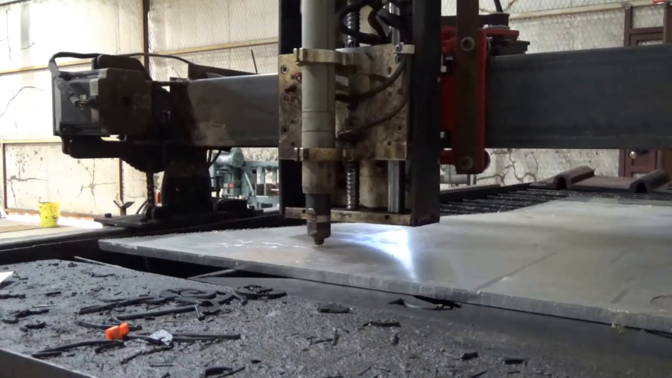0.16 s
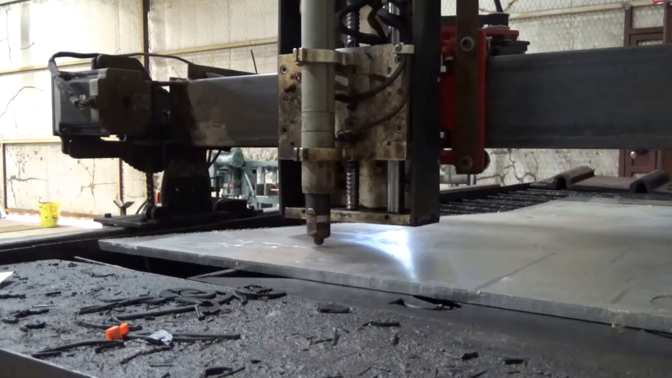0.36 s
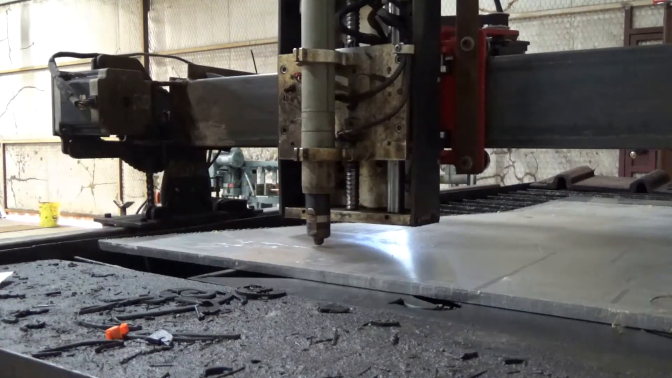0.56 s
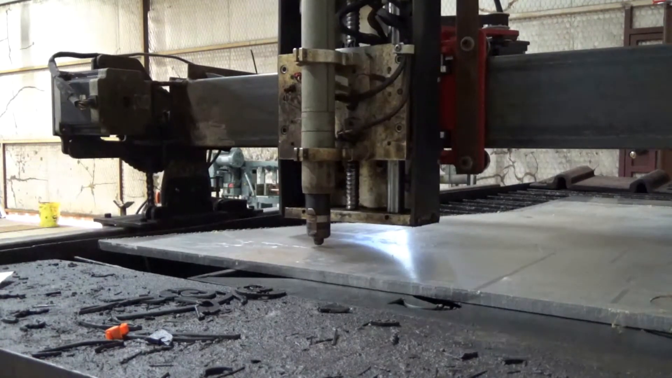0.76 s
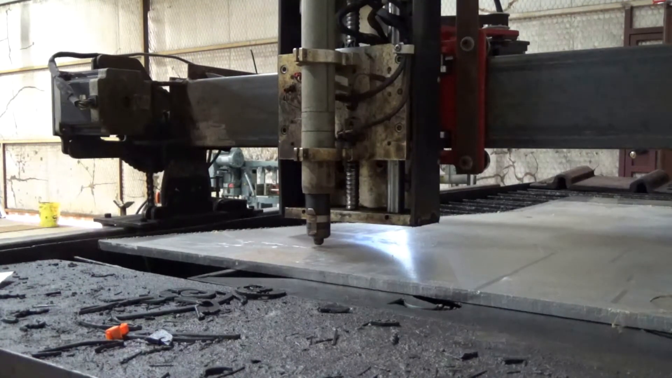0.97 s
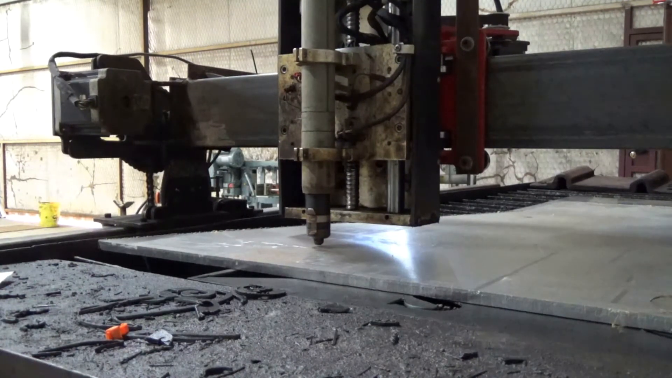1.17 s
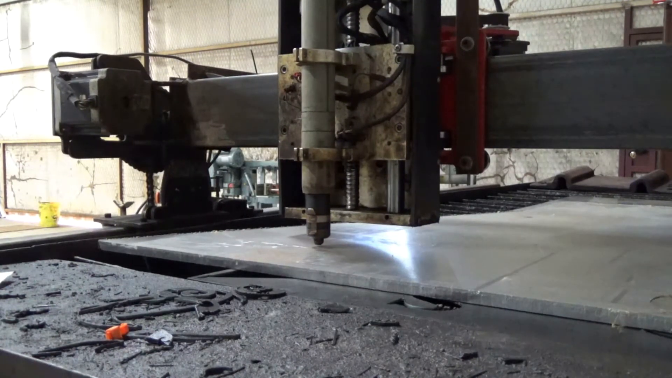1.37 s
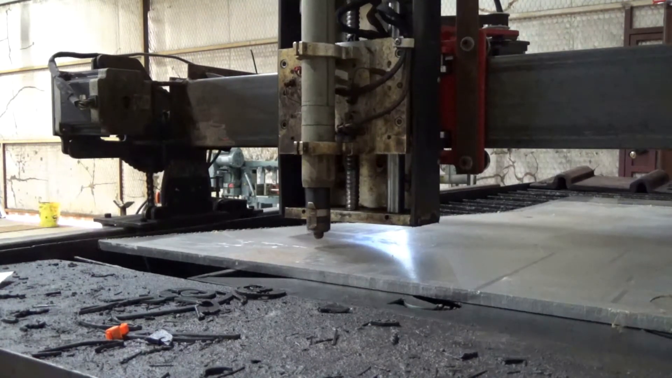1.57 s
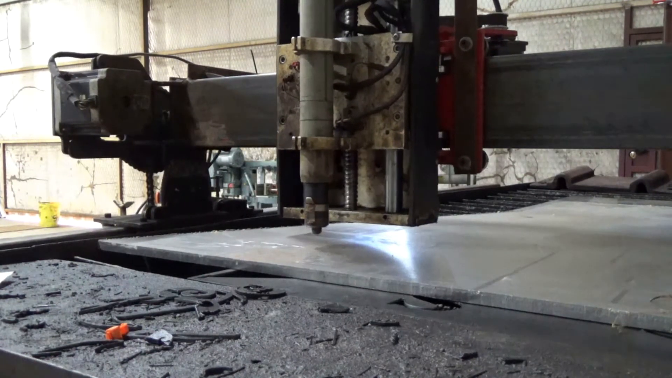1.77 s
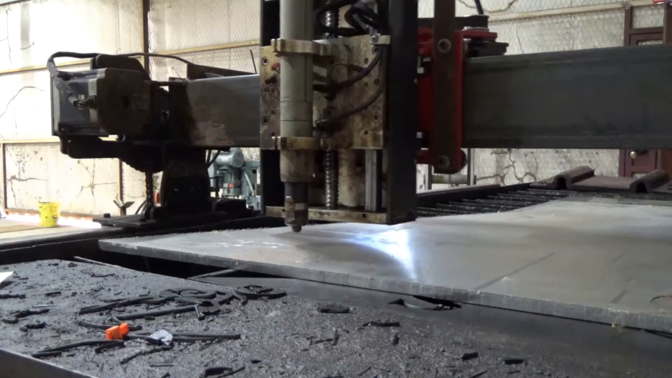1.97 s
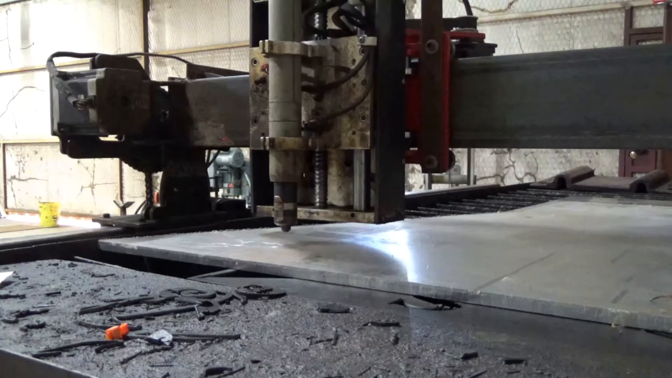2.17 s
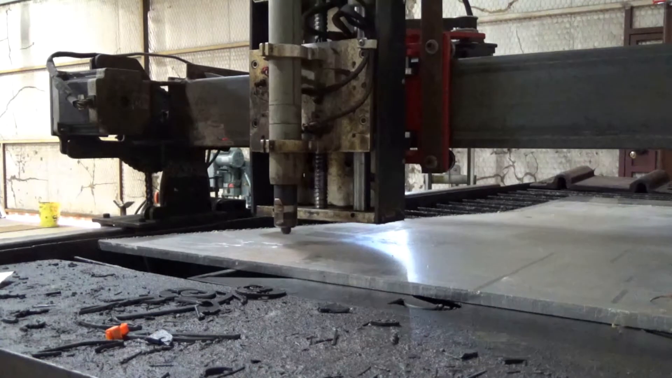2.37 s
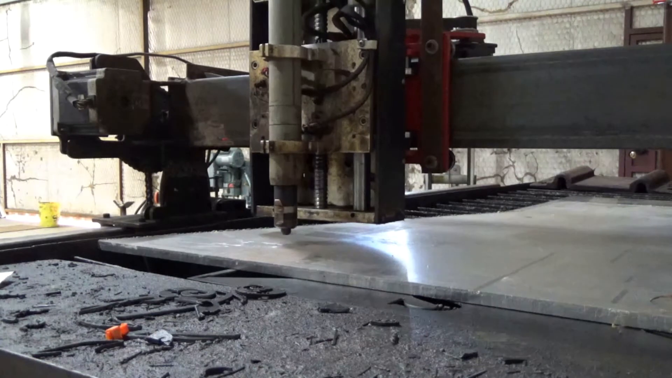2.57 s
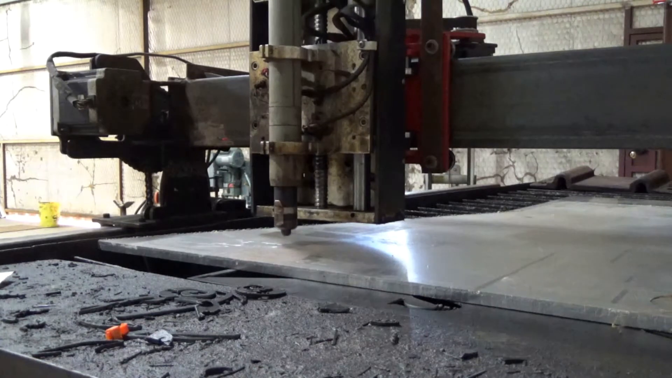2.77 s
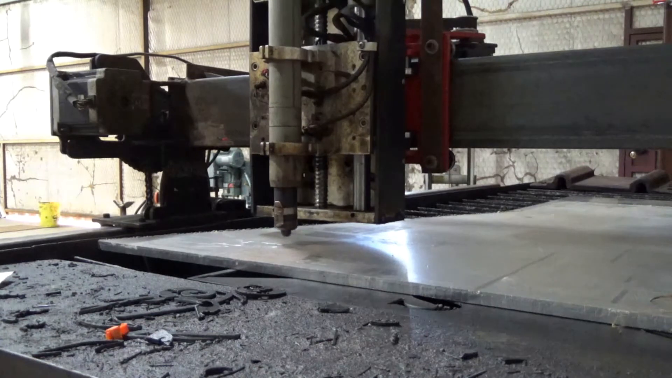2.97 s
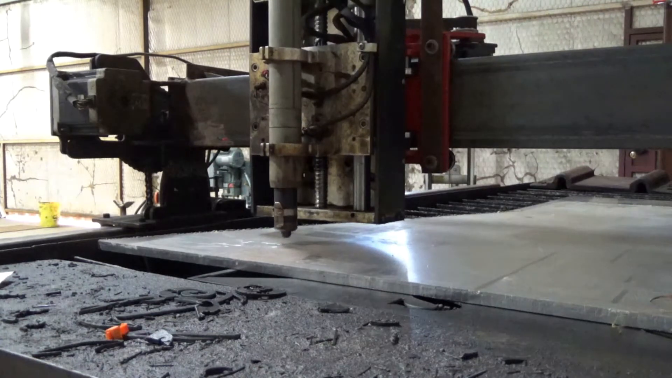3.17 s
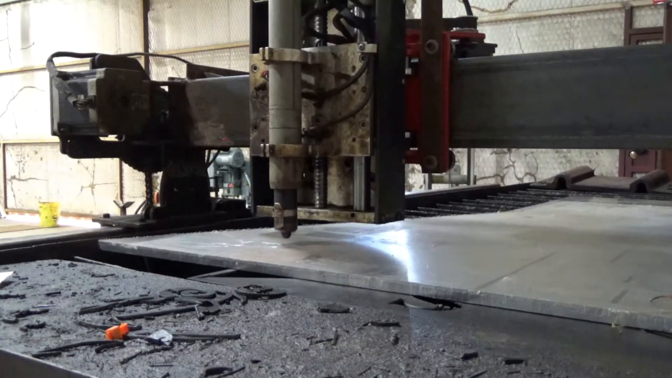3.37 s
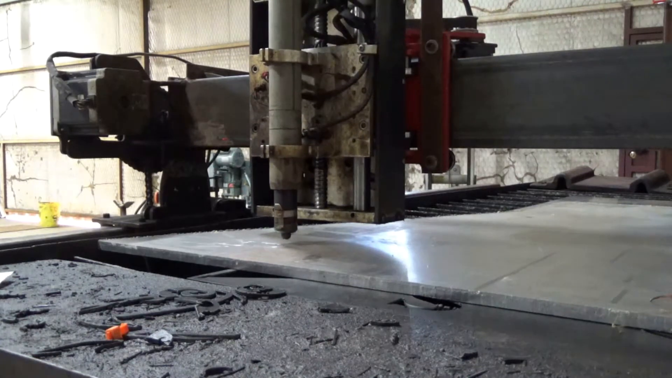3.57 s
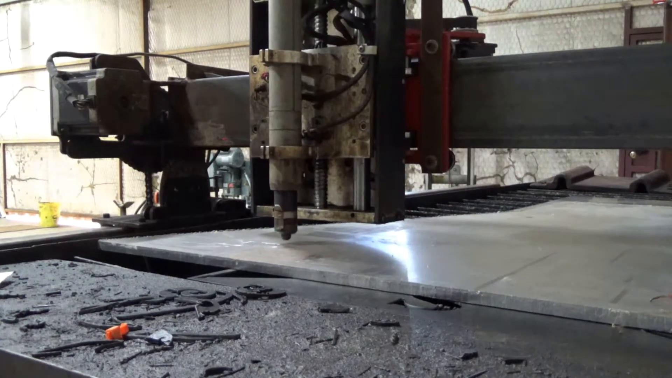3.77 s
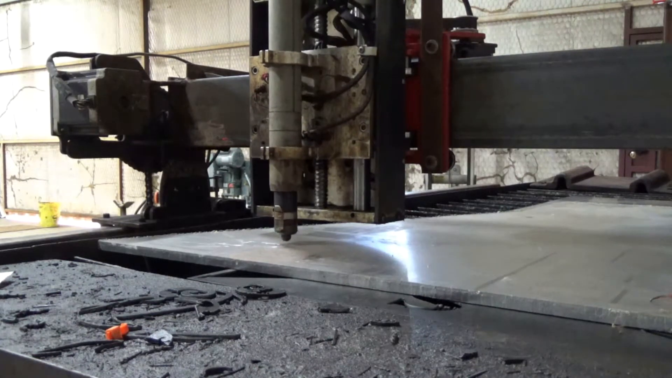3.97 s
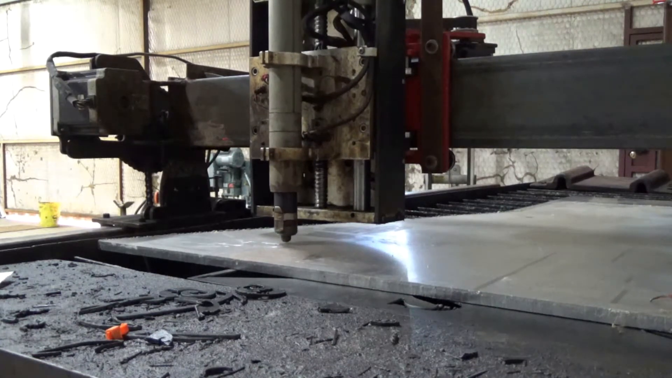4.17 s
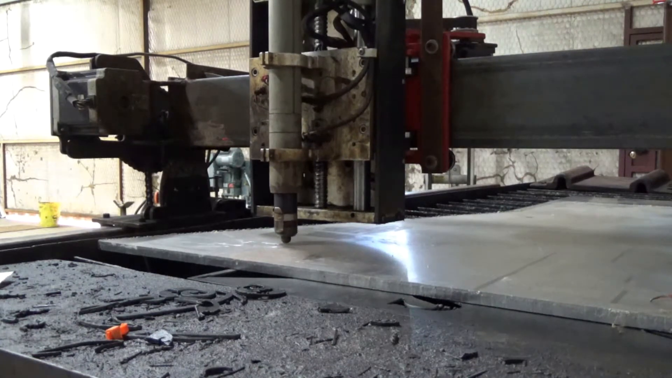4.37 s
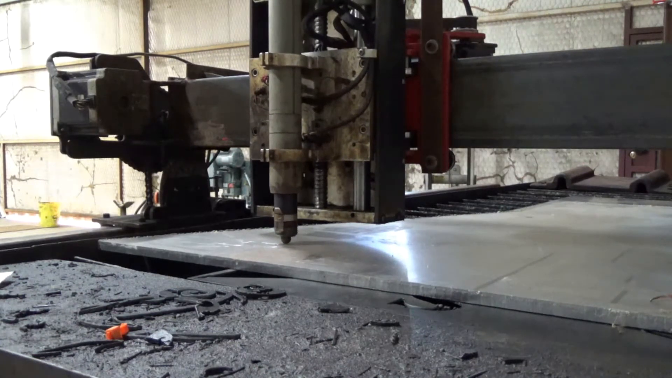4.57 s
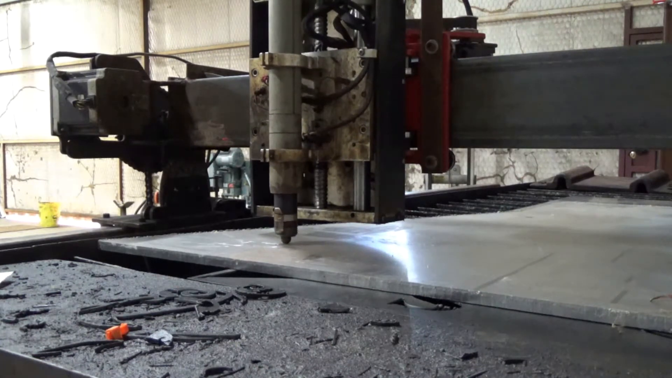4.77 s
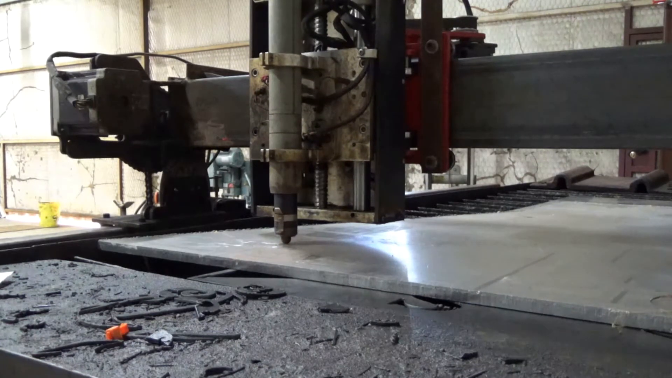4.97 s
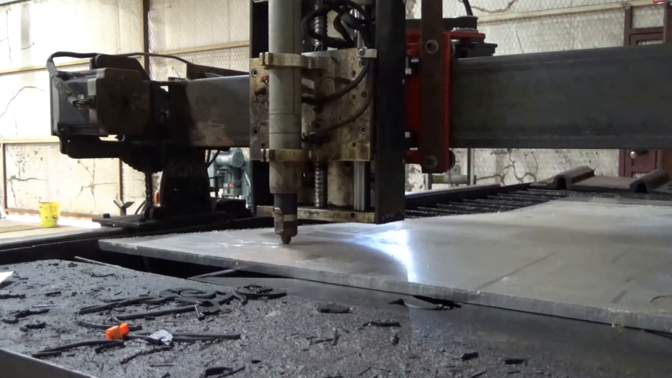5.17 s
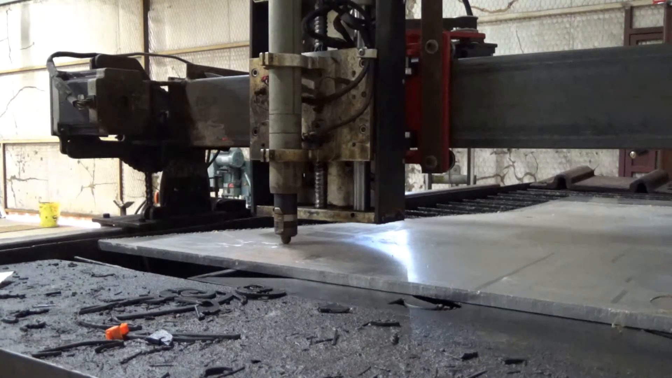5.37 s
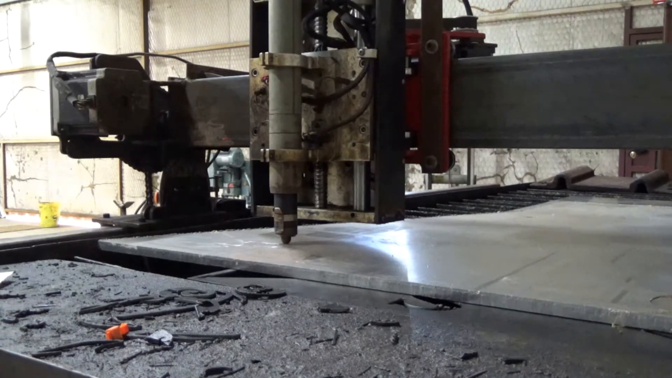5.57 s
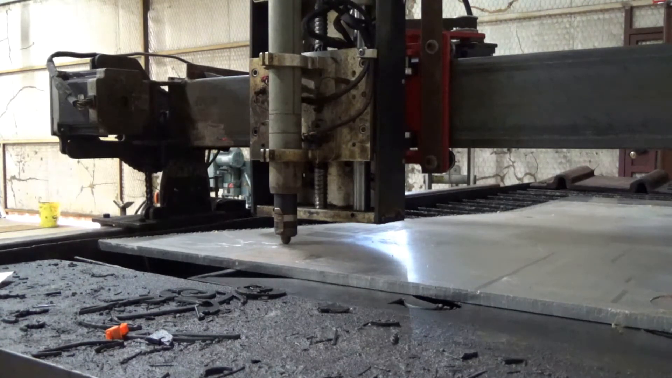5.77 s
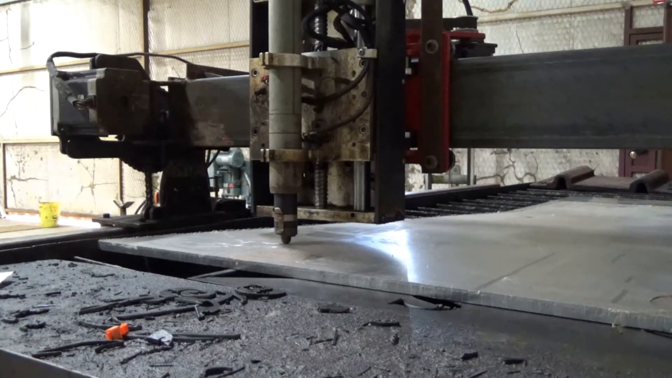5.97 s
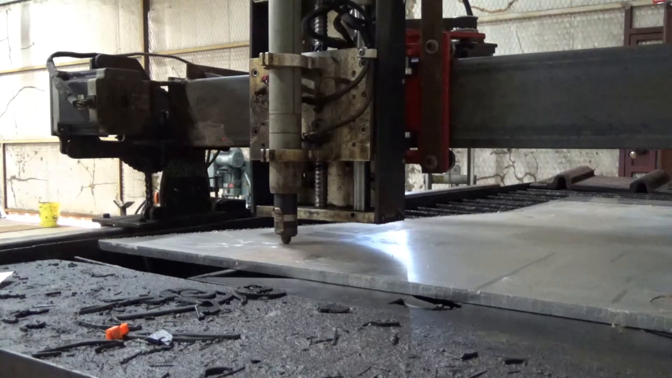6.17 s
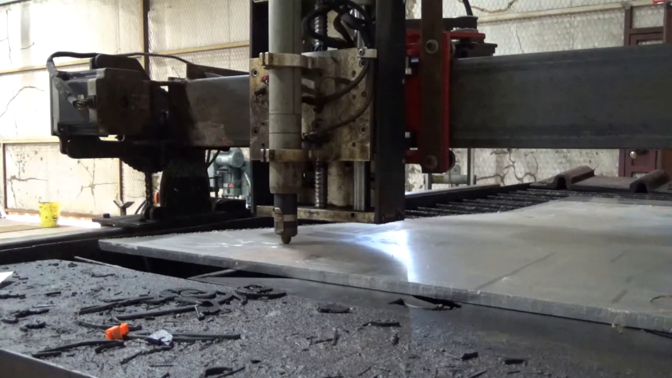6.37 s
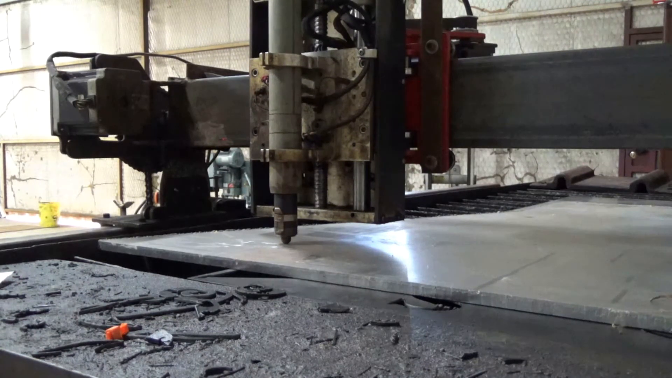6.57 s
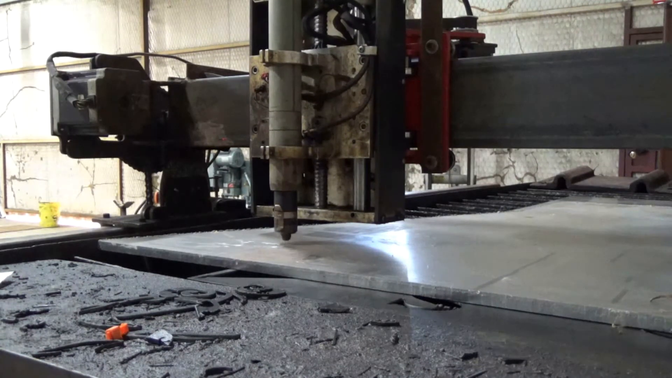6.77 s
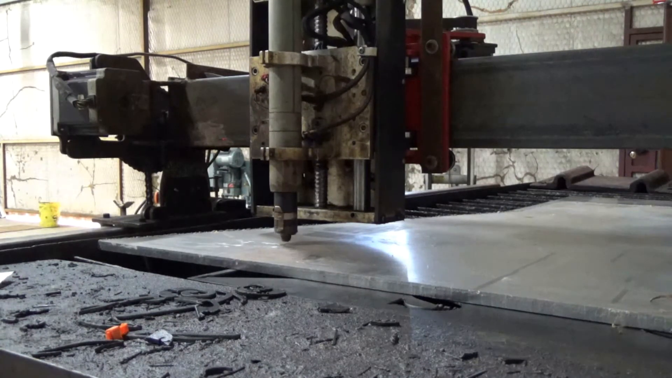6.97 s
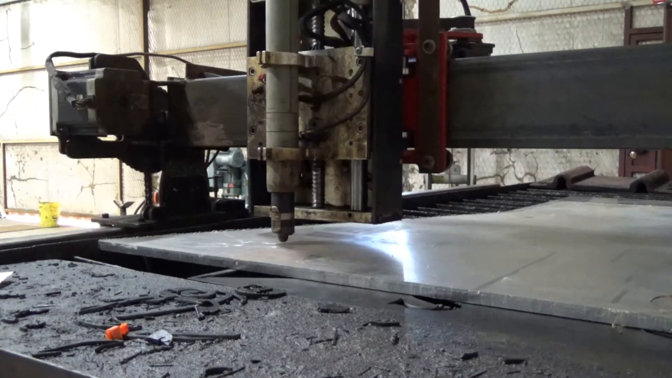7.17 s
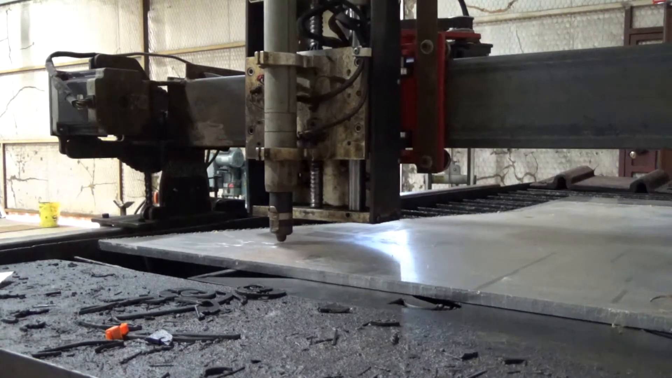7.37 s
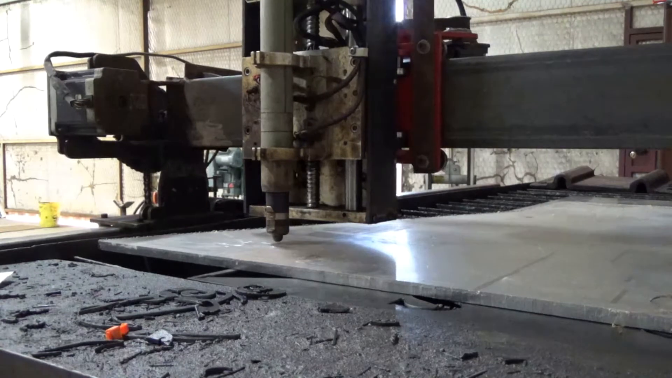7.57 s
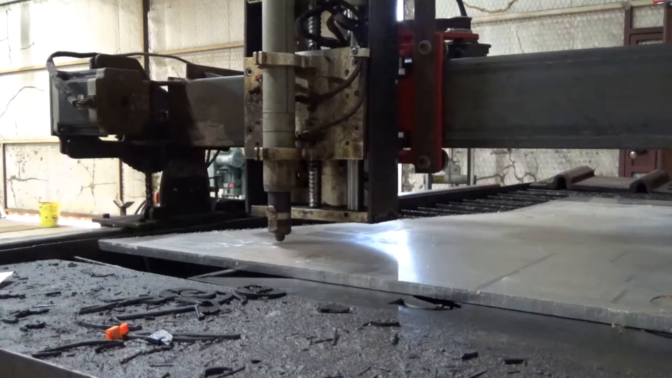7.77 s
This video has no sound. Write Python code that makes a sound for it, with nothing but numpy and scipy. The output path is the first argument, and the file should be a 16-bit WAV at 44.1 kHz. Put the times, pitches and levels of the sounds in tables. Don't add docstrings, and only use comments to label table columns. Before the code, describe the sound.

In a steel-walled shed, fans hum low, air murmurs and motor drives give a thin fuzzy whistle near 9 kHz. A high lift-motor whine already running stops at 0.13 s as the gantry jerks, rumbling, singing briefly and slapping its cable chain until about 0.6. Small dull knocks dot the quiet, strongest at 1.07. A bright whine near 1.7 kHz sweeps up and down at 1.42-1.74; the gantry then glides with rising and falling motor tones until 2.2, overlapped by a short whine at 2.17-2.32. From 2.35 to 6.38 a steady raspy buzz at about 184 steps per second rings the metal carriage, overtones wavering, with soft air puffs around 3-3.6. A twitch at 6.41, a long whine at 6.46-6.87 and another until 7.04 follow. Rough rumbling, grinding and loud chain clatter, ringing off the walls, continue to the end near 8.

```python
import sys
import numpy as np
from scipy import signal
from scipy.fft import rfft, irfft, next_fast_len
from scipy.io import wavfile
from scipy.ndimage import uniform_filter1d, map_coordinates

SR = 44100
rng = np.random.default_rng(int(sys.argv[2]) if len(sys.argv) > 2 else 0)


def nominal_scale(level):
    x = np.asarray(level, float) / 20
    return 10 ** x


def persist_wave(psi):
    counts = np.round(np.clip(psi, -1, 1) * 32767).astype(np.int16)
    wavfile.write(sys.argv[1], SR, np.atleast_2d(counts).T)


N = 344862
TIME = np.arange(N) / SR
COARSE = TIME[::32]
FAST, SLOW = 1719.8, 184.38

# (start [s], stop [s], acceleration [steps/s2])
STROKES = [
    (-.2, .13, 24000),
    (1.42, 1.744, 28000),
    (2.172, 2.322, 17000),
    (6.41, 6.452, 16000),
    (6.464, 6.868, 15200),
    (6.888, 7.044, 15600),
]
# (start [s], stop [s], acceleration [steps/s2])
DESCENT = (2.352, 6.378, 16000)
# (frequency [Hz], width [Hz])
PANELS = [(1659.5, 130), (1843.8, 130)]
# (time [s], level [dB])
SHAKE = [
    [(0.06, -38), (0.1, -57), (0.124, -25.5), (0.164, -21), (0.24, -19.5), (0.302, -27.5), (0.406, -36.5),
     (0.436, -38.5), (0.62, -49)],
    [(1.7, -27), (1.712, -41), (1.754, -25), (1.914, -25), (1.986, -22.5), (2.04, -26), (2.162, -25.5),
     (2.198, -27.5), (2.34, -30.5)],
    [(6.98, -42), (7.032, -25.5), (7.2, -26.5), (7.242, -24.5), (7.394, -26.5), (7.59, -22), (7.656, -30.5),
     (7.672, -20.5), (7.82, -24)],
]
# (time [s], peak [dB], knock [dB], chain t60 [s])
RATTLE = [(0.034, -37, 11, 0.05), (0.07, -29, 5.5, 0.089), (0.2134, -10.5, -23, 0.094),
          (0.2234, -22.5, -3, 0.053), (1.439, -32, 1, 0.061), (1.6174, -24, 2.5, 0.087),
          (1.7263, -24.5, 6.5, 0.09), (1.9586, -39, 5, 0.051), (1.987, -19, -12, 0.075),
          (2.164, -25.5, 2, 0.079), (2.236, -26, -1, 0.055), (2.2867, -38, 5, 0.048),
          (7.007, -36, 3, 0.065), (7.027, -25, -3, 0.067), (7.0346, -14, -3, 0.089),
          (7.1046, -26, 5, 0.063), (7.1706, -24, -5, 0.091), (7.192, -23.5, -19, 0.061),
          (7.2335, -20, -17, 0.075), (7.247, -10.5, -6, 0.09), (7.2728, -11, -6, 0.044),
          (7.283, -15, -21, 0.051), (7.427, -22, -2, 0.038), (7.477, -23.5, 3, 0.052),
          (7.5864, -19.5, -5, 0.055), (7.614, -33, -3, 0.055), (7.669, -13.5, -4.5, 0.062),
          (7.715, -21, -14, 0.082), (7.734, -21, -1, 0.1), (7.8114, -20.5, 1, 0.049)]


def unit(x):
    return x / np.sqrt(np.mean(x ** 2) + 1e-20)


def along(points, hz):
    f, v = np.transpose(points)
    return np.interp(np.log(hz + 1), np.log(f + 1), v)


def curves(rows):
    s, *cols = np.transpose(rows)
    return [np.interp(TIME, s, c, left=-120, right=-120) for c in cols]


def wobble(rate):
    knots = rng.standard_normal(int(N * rate / SR) + 4)
    return np.interp(TIME, COARSE, map_coordinates(knots, [COARSE * rate]))


def bump(s, length):
    return np.interp(TIME, COARSE, np.exp(-((COARSE - s) / length) ** 2))


def filtered(x, response):
    m = next_fast_len(N + SR // 2, True)
    return irfft(rfft(x, m) * response(np.fft.rfftfreq(m, 1 / SR)), m)[..., :N]


def body(modes):
    def ring(f):
        total = 0
        for k, (c, w, db) in enumerate(modes):
            total = total + (-1) ** k * nominal_scale(db) * 1j * f * w / (c * c - f * f + 1j * f * w)
        return total
    return lambda f: np.interp(f, f[::16], ring(f[::16]))


def noise(response, lumps=1):
    return unit(filtered(lumps * rng.standard_normal(N), response))


def steps(start, stop, accel, top, phases, jitter):
    rate = np.clip(accel * np.minimum(TIME - start, stop - TIME), 0, top)
    count = np.cumsum(rate) / SR
    k = np.arange(1, int(count[-1]))
    db, late = np.array(phases)[k % 4].T
    at = np.interp(k + jitter * rng.standard_normal(len(k)), count, np.arange(N)) + late * SR / 1580000.0
    taps = np.floor(at)[:, None] + np.arange(-7, 9)
    away = taps - at[:, None]
    shape = np.sinc(away) * np.cos(away * np.pi / 16) ** 2
    size = nominal_scale(db) * SR / top
    places = np.clip(taps, 0, N - 1).astype(int).ravel()
    return rate / top, count, np.bincount(places, (shape * size[:, None]).ravel(), N)


def stroke_whine(k, speed, count):
    # (multiple of the four-step cycle, level [dB])
    loaded_cycle = [(1, -8.5), (2, -13.5), (3, -11), (4, 4), (5, -7), (6, -12.5), (7, -13), (8, -24),
                    (9, -31), (10, -17), (11, -38), (12, -34), (13, -24), (14, -29)]
    # (multiple of the four-step cycle, level [dB])
    free_cycle = [(1, -29), (2, -18), (3, -17), (4, 0), (5, -21), (6, -63), (7, -37), (8, -16.5), (9, -26),
                  (10, -31.5), (11, -30.5), (12, -24.5), (13, -19.5), (14, -25.5), (15, -30), (16, -26),
                  (17, -33), (18, -31), (19, -50), (20, -40), (21, -38), (22, -31)]
    whine_db = [-31.5, -20.5, -16, -40, -20.5, -13]
    whine, on = np.zeros(N), speed > 0
    for order, db in free_cycle if k else loaded_cycle:
        if order == 4 and k:
            continue
        if order == 8:
            fade = 2.2
        else:
            fade = 3.1 if k else 9
        cycles = order * count[on] / 4 + rng.random()
        whine[on] += nominal_scale(whine_db[k] + db) * speed[on] ** fade * np.sin(2 * np.pi * cycles)
    return whine


def lift_drive():
    # (strength [dB], lateness [0.63 microseconds])
    slow_phases = [(1.5, -5), (3, 19), (1, 32), (2, 50)]
    # (strength [dB], lateness [0.63 microseconds])
    fast_phases = [(21, 7), (-10, 33), (28.5, -2), (28, 64)]
    # (step blow [dB], torque ripple [dB], its extra while speeding up [dB],
    # its extra while braking [dB], grind [dB])
    effort = [(-30, -60, 0, 0, -38), (-30, -18, -6, -0.5, -30), (-28, -23, 2, 3, -34.5),
              (-40, -28, 0, 0, -27), (-29.5, -22, 3.5, 5, -30.5), (-27, -18, 3.5, 1, -35),
              (-38.5, -62, 0, 0, -54.5)]
    force, torque, grind, whine = np.zeros((4, N))
    moves = [(row, FAST, fast_phases, .004) for row in STROKES] + [(DESCENT, SLOW, slow_phases, .0005)]
    for k, (move, (blow_db, ripple_db, start_db, brake_db, grind_db)) in enumerate(zip(moves, effort)):
        row, top, phases, jitter = move
        speed, count, blows = steps(*row, top, phases, jitter)
        blow_db = blow_db - (23 if top == FAST else 9)
        force += nominal_scale(blow_db) * blows * (1 - speed * top / FAST) ** 4.0
        extra_db = np.where(TIME < (row[0] + row[1]) / 2, start_db, brake_db)
        ripple = nominal_scale(ripple_db + extra_db * np.sqrt(1 - speed)) * speed ** .5
        torque += ripple * np.sin(2 * np.pi * count)
        grind += nominal_scale(grind_db) * speed ** 0.56 * (1 + 0.54 * np.cos(2 * np.pi * count))
        if top == FAST:
            whine += stroke_whine(k, speed, count)
    return force, torque, grind, whine, blows, count


def carriage(force):
    # (frequency [Hz], width [Hz], level [dB])
    carriage_modes = [(552.5, 38, 4.5), (845, 14, -3), (964, 13, 4.5), (1146.4, 31, 6), (1280, 113, 2),
                      (1537, 155, 1), (1780, 740, -8.5), (2116, 440, -7), (2920, 99, -4), (3379, 62, 4),
                      (3580, 117, -1.5), (4250, 39, -16), (5030, 110, -28), (5700, 130, -24),
                      (6300, 400, -32.5), (7310, 320, -25.5), (8520, 250, -25.5), (9220, 100, -22),
                      (9957, 70, -14), (11000, 240, -27)]

    def response(f):
        answer = body(carriage_modes)(f)
        for hz, width in PANELS:
            answer = answer * (1 - body([(hz, width, 0)])(f))
        return answer
    return filtered(force, response)


def winding_ticks(blows, count):
    # (frequency [Hz], width [Hz], level [dB])
    housing = [(4500, 360, -19), (5205, 50, -5), (5470, 260, -9), (5765, 50, -9), (6050, 180, -19.5),
               (6680, 240, -23.5), (7220, 72, -11)]
    # (frequency [Hz], width [Hz], level [dB])
    end_caps = [(830, 25, -16), (1198, 30, -14), (1567, 30, -8), (7860, 400, -22), (8650, 120, -18),
                (8950, 200, -14.5), (9180, 50, -6), (9750, 300, -17), (10600, 400, -20)]
    reversal = filtered(blows * np.cos(np.pi / 2 * count - .6), body(housing))
    turns = filtered(blows * np.cos(np.pi * count), body(end_caps))
    return nominal_scale(-52.5) * (reversal + turns)


def plate_echo(x):
    for delay, drift, rate, db in [(45, 2, .7, -16), (130, 2, 2.2, -17)]:
        x = x + nominal_scale(db) * np.interp(np.arange(N) - delay - drift * wobble(rate), np.arange(N), x)
    return x


def covers(blows):
    cover_db = [-43.5, -44]
    # (time [s], length [s], change of level [dB])
    chokes = [
        [(3.5, 0.24, -9), (4.9, 0.11, -12), (5.1, .16, -9), (5.9, 0.82, -1.5)],
        [(2.75, 0.28, -5), (3.58, 0.06, -14), (4.22, 0.15, -8), (4.6, 0.28, -8), (5.15, 0.052, -15),
         (4.98, .07, 3), (5.36, .1, 4), (3.8, .15, 2), (5.68, 0.13, -10), (6.07, 0.12, -9), (6.25, 0.074, -9)],
    ]
    out = np.zeros(N)
    for (hz, width), db, touches in zip(PANELS, cover_db, chokes):
        for s, length, depth_db in touches:
            db = db + depth_db * np.minimum(1.5 * bump(s, length), 1)
        sharp = lambda f: body([(hz, width, 0)])(f) ** 2
        out += nominal_scale(db) * unit(filtered(blows, sharp))
    return out


def mount_hum(torque):
    mount_hz = [600, 819, 972, 1165, 1270, 1480, 1730]
    # (width [Hz], level [dB])
    mount_modes = [(216, -21), (11.8, 12.5), (16.3, 9.5), (28, 11.5), (85, 7.5), (138.89, 6), (200, 0.5)]
    modes = [(hz, *mode) for hz, mode in zip(mount_hz, mount_modes)]
    return filtered(torque * nominal_scale(1.6 * wobble(45) + 1.5 * wobble(9)), body(modes))


def screw(grind):
    # (frequency [Hz], level [dB per Hz])
    screw_tone = [(71, -52), (120, -17), (481, -14), (717, -12), (1400, -15.5), (1690, -8.5), (1960, -15.5),
                  (2560, -32), (3480, -24), (4540, -32.5), (5810, -30.5), (10700, -35.5), (11300, -62),
                  (14700, -92), (22000, -120)]
    colour = lambda f: nominal_scale(along(screw_tone, f) - 5.6 * np.exp(-((f - 6900) / 1300) ** 2))
    return grind * nominal_scale(1.75 * wobble(30)) * noise(colour)


def lift():
    force, torque, grind, whine, blows, count = lift_drive()
    ring = plate_echo(carriage(force) + winding_ticks(blows, count)) + covers(blows)
    return ring + mount_hum(torque) + whine * nominal_scale(-0.5 + 1.9 * wobble(25)) + screw(grind)


def fan_tones():
    fan_hz = [127, 306.8, 613.6, 920.4]
    # (unsteadiness [Hz], level [dB])
    fan_levels = [(6.43, -50.5), (1.246, -52.5), (0.61, -63), (1.74, -62)]
    out = np.zeros(N)
    for hz, (width, db) in zip(fan_hz, fan_levels):
        turns = np.cumsum(hz + width * wobble(14)) / SR
        out += nominal_scale(db + 0.71 * wobble(6.9)) * np.sqrt(2) * np.sin(2 * np.pi * turns)
    return out


def drive_whistle():
    # (time [s], length [s], level [dB])
    strain = [
        (1.833, 0.085, -46.5),
        (2.083, 0.046, -46),
    ]
    switch_s = 0.021

    def running(moves):
        return sum(np.clip(np.minimum(TIME - start, stop - TIME) / switch_s, 0, 1) for start, stop, _ in moves)
    current = nominal_scale(-59) + nominal_scale(-58.5) * running([DESCENT]) + nominal_scale(-55) * running(STROKES)
    current = current + nominal_scale(-31) * sum(nominal_scale(curves(move)[0]) for move in SHAKE)
    current = current + sum(nominal_scale(db) * bump(s, length) for s, length, db in strain)
    return current * nominal_scale(-3.0 + 1.1 * wobble(27)) * noise(body([(9460, 150, 9), (9200, 900, -6)]))


def draught():
    # (time [s], length [s], rise [dB])
    gusts = [(1.13, .08, 7), (2.05, .1, 6), (3.046, 0.097, 17), (3.267, 0.083, 17.5), (3.58, 0.16, 15),
             (6.79, .08, 12), (7.102, .07, 6), (7.51, .07, 7)]
    puff = lambda: noise(lambda f: f / 30 / (1 + (f / 45) ** 4))
    rise_db = sum(db * bump(s, length) for s, length, db in gusts)
    strength = nominal_scale(-66 + rise_db + 1.4 * wobble(12))
    return strength * (puff() + 0.1 * np.array([puff(), puff()]))


def shed_air():
    # (frequency [Hz], level [dB per Hz])
    air_tone = [(12, -56), (20, -32), (86, -13.5), (112, -10), (150, -12), (307, -2.5), (379, -12),
                (698, -11), (863, -12), (935, -13.5), (1470, -16), (3160, -20), (3520, -20.5),
                (9390, -25.5), (11300, -27), (14700, -74), (22000, -120)]
    # (frequency [Hz], likeness [0-1])
    alike = [(60, 1), (170, 1), (490, 0.88), (1400, 0.68), (3980, 0.39), (11400, 0.77)]
    z = signal.stft(rng.standard_normal((2, N)), nperseg=512)[2]
    patches = uniform_filter1d(uniform_filter1d(rng.standard_normal(z.shape[1:]), 6, 0), 12, 1)
    pair = signal.istft(z * nominal_scale(1.77 * unit(patches)), nperseg=512)[1][:, :N]

    def colour(f):
        angle = np.arccos(np.clip(along(alike, f), -1, 1)) / 2
        level = nominal_scale(along(air_tone, f) - 3.1 * np.exp(-((f - 6800) / 1400) ** 2))
        return level * [np.cos(angle), np.sin(angle)]
    mid, side = filtered(pair, colour)
    return nominal_scale(-43) * unit(np.array([mid + side, mid - side])) + draught()


def burst(at, db, t60, rise):
    out, t = np.zeros(N + SR), np.arange(SR // 4) / SR
    for s, level, life in zip(at, db, t60):
        puff = nominal_scale(level - 60 * t / life) * (1 - np.exp(-t / rise)) * rng.standard_normal(len(t))
        out[round(s * SR):][:len(t)] += puff
    return out[:N]


def rattle():
    # (frequency [Hz], width [Hz], level [dB])
    chain = [(5650, 210, 4), (5980, 180, 5), (6540, 320, -2), (7160, 200, 2), (8060, 380, -7.5),
             (9730, 450, -10)]
    s, db, knock_db, t60 = np.transpose(RATTLE)
    links = burst(s, db + 4.0, t60, rise=0.0015)
    links = filtered(links, lambda f: body(chain)(f) + nominal_scale(-24))
    knock = burst(s, db + knock_db + 12.0, 0.8 * t60, rise=0.0013)
    return links + filtered(knock, body([(680, 990, -6.5), (2110, 160, 1.5), (3000, 95, -2.5)]))


def slaps(t60):
    hits = np.bincount([round(row[0] * SR) for row in RATTLE], [nominal_scale(row[1]) for row in RATTLE], N)
    return signal.lfilter([1], [1, -nominal_scale(-60 / (t60 * SR))], hits)


def below(f, hz):
    return 1 / (1 + (f / hz) ** 6)


def rack_rumble(speed):
    # (frequency [Hz], width [Hz], level over the rack noise [dB])
    beam_modes = [(149, 28, 5.5), (285, 100, 1), (420, 30, 3), (530, 50, -5), (667, 25, 7.5),
                  (840, 11, 3.5), (947, 9.8, 3), (1155, 34, 2.5), (1397, 120, -3), (2010, 31, 8),
                  (3110, 140, -1.5)]
    # (frequency [Hz], level [dB per Hz])
    rack_tone = [(29, -59), (50, -15), (152, -6), (209, -17.5), (274, -6.5), (505, -3), (664, -1),
                 (1430, -6.5), (1610, -9.5), (2060, -10.5), (4170, -26.5), (5850, -21.5), (11300, -38),
                 (14700, -69), (22000, -120)]
    # (low rumble [dB], beam ring [dB], upper rasp [dB])
    shares = [
        (-1.5, -2, -15.5),
        (-6.5, -3, -18.5),
        (-2.5, 0.5, -13),
    ]
    low, mid, rasp = sum(nominal_scale(curves(move)[0] + np.array(share)[:, None]) for move, share in zip(SHAKE, shares))
    low = low * nominal_scale(-15 * speed ** 3)
    rasp = rasp + nominal_scale(-19) * slaps(t60=0.049)
    beam = lambda f: nominal_scale(along(rack_tone, f)) * (0.81 + np.abs(body(beam_modes)(f)))
    teeth = nominal_scale(1.7 * wobble(110))
    low = low * nominal_scale(-1.5 + 0.68 * wobble(40)) * noise(lambda f: beam(f) * below(f, 460), teeth)
    ring = noise(lambda f: beam(f) * below(f, 1290) * (1 - below(f, 453)), teeth)
    mid = mid * nominal_scale(-4.0 + 1.3 * wobble(30)) * ring
    upper = noise(lambda f: beam(f) * (1 - below(f, 1120)), teeth ** 0.71)
    return low + mid + rasp * nominal_scale(4.0 + 0.76 * wobble(30)) * upper


def gantry_motors(travel_steps):
    # (frequency [Hz], width [Hz], level [dB])
    beam_drive = [(195, 43, 12), (287, 45, 9.5), (420, 37, 13), (548, 25, 10), (660, 28, 19)]
    # (frequency [Hz], width [Hz], level [dB])
    cross_drive = [(844, 25, 10.5), (1403, 48, 7), (1700, 89, 5), (2010, 120, 9.5), (2255, 77, 6.5),
                   (3180, 300, 0)]
    (speed, _, blows), (cross_speed, _, cross) = travel_steps
    blows = blows * nominal_scale(2.0 * wobble(60.03)) / (speed + 0.32) ** 0.35
    motor = nominal_scale(-33.5) * filtered(blows, lambda f: body(beam_drive)(f) * below(f, 940))
    cross = cross * nominal_scale(1.6 * wobble(70)) / (cross_speed + 0.17) ** 1.1
    path = lambda f: body(cross_drive)(f) * (1 - below(f, 630)) * (.15 + below(f, 2280))
    return (motor + nominal_scale(-37) * filtered(cross, path)) * nominal_scale(wobble(35.07))


def wheel_song():
    # (time [s], length [s], frequency [Hz], glide [Hz/s], level [dB])
    singing = [(0.119, 0.012, 2010, -6000, -23), (0.142, 0.011, 1780, -12000, -23),
               (0.373, 0.11, 298, 2, -34.5), (0.13, 0.0065, 660, 0, -26), (0.217, .012, 425, -1500, -27),
               (0.222, .008, 1975, 0, -32), (0.237, 0.0076, 652, 300, -23), (0.264, .009, 646, 2000, -24),
               (7.092, .014, 790, 3000, -29), (7.13, 0.0088, 680, -3000, -33),
               (1.746, .008, 1800, 22000, -29), (1.784, .009, 1950, 38000, -27),
               (2.145, .01, 2000, -20000, -28), (7.162, 0.01, 2010, -9000, -35),
               (7.232, 0.016, 420, 0, -30), (7.265, .012, 300, -800, -33), (7.299, 0.011, 304, 0, -28),
               (7.385, 0.019, 250, 4500, -38), (7.41, 0.014, 1395, 0, -37), (7.488, .014, 844, 0, -32),
               (7.618, 0.021, 660, 1200, -29), (7.672, 0.011, 727, 0, -30), (7.78, .011, 675, 0, -27),
               (7.068, 0.012, 653, 2500, -24), (7.148, 0.027, 646, -300, -28.5),
               (7.35, 0.017, 1390, 500, -30.5), (7.466, 0.0091, 660, 2000, -25),
               (7.478, .015, 1380, 4000, -33), (7.545, 0.091, 170, -4, -28), (7.785, 0.036, 284, 0, -26)]
    song = np.zeros(N)
    for s, length, hz, glide, db in singing:
        cycles = (hz + glide * (TIME - s) / 2) * (TIME - s)
        song += nominal_scale(db + 3.5) * bump(s, length) * np.sin(2 * np.pi * cycles)
    return song * nominal_scale(1.4 * wobble(70))


def gantry():
    # (start [s], stop [s], acceleration [steps/s2])
    travel = [
        (1.732, 2.201, 2560),
        (1.732, 2.201, 3830),
    ]
    # (strength [dB], lateness [0.63 microseconds])
    gantry_phases = [(-3, 0), (-2.5, 0), (-1, 0), (-3.5, 0)]
    travel_steps = [steps(*move, 920, gantry_phases, jitter=0.01) for move in travel]
    beam_speed = travel_steps[0][0]
    return rack_rumble(beam_speed) + gantry_motors(travel_steps) + wheel_song()


def knocks():
    # (time [s], peak
    # [dB], frequency [Hz], t60 [s])
    ticks = [(.398, -31, 3580, 0.019), (0.577, -29, 330, 0.05), (0.798, -21.5, 303, 0.014),
             (.813, -28, 1550, 0.031), (.814, -32, 800, .03), (0.813, -33, 2670, 0.024),
             (1.074, -18, 212, 0.061), (1.074, -11.5, 420, 0.017), (1.075, -40, 3000, .06),
             (1.086, -32, 2320, 0.15), (1.094, -35, 2640, 0.17), (1.076, -36.5, 9260, 0.22),
             (1.095, -28, 3910, 0.043), (1.108, -20, 390, 0.031), (1.41, -25, 786, .04),
             (6.367, -29.5, 1140, 0.08), (6.42, -24.5, 1250, 0.034), (6.474, -26, 1180, .05),
             (3.03, -39, 2890, 0.088), (3.22, -40, 6340, 0.055), (3.227, -37, 2810, 0.13),
             (3.46, -36, 3000, .08), (4.17, -34, 2220, .04), (4.171, -37, 2700, .03),
             (7.155, -33, 3550, 0.034), (1.708, -21, 831, .35), (2.22, -24, 822, .1),
             (1.99, -23, 2020, .04), (2.161, -21, 1390, .05), (7.005, -27, 817, 0.34),
             (7.716, -19, 660, .06), (7.668, -20, 745, .05), (7.669, -17, 1930, .04),
             (7.67, -31, 2160, 0.033)]
    out, t = np.zeros(N + SR), np.arange(SR // 4) / SR
    for s, db, hz, t60 in ticks:
        rough = hz / 3000
        drift = np.cumsum(0.245 * rough * rng.standard_normal(len(t)))
        ring = np.sin(2 * np.pi * hz * t + drift) + 0.33 * rough * rng.standard_normal(len(t))
        out[round(s * SR):][:len(t)] += nominal_scale(db - 60 * t / t60) * (1 - np.exp(-t / 0.0007)) * ring
    return out[:N]


def shed(x):
    # (frequency [Hz], t60 [s])
    shed_t60 = [(150, 0.34), (1000, 0.45), (4000, 0.45), (10000, 0.66)]
    hz, t, z = signal.stft(rng.standard_normal((2, SR)), SR, nperseg=256)
    tail = signal.istft(z * nominal_scale(-60 * t / along(shed_t60, hz)[:, None]), SR, nperseg=256)[1]
    late = np.pad(x, (500, 0))[None]
    return signal.fftconvolve(late, tail / np.linalg.norm(tail[0]), axes=1)[:, :N]


def scene():
    head, hum = lift(), fan_tones() + drive_whistle()
    beam, small = rattle() + gantry(), knocks()
    direct = head * nominal_scale([[.1], [-.1]]) + beam * nominal_scale([[-.5], [.5]]) + small + hum
    machine = direct + nominal_scale(-8) * shed(head + beam + small + hum)
    no_deep_bass = lambda f: (1j * f / (70 + 1j * f)) ** 3
    return filtered(machine, no_deep_bass) + shed_air()


def roll_off(x):
    return signal.sosfilt(signal.butter(12, 11970, fs=SR, output="sos"), x)


def record(dry):
    band = lambda f: (1 / (1 + (f / 11100) ** 260) + .012) * (f < 12000)
    return roll_off(filtered(dry, band))


dry = scene()
out = record(dry)
persist_wave(out)
```